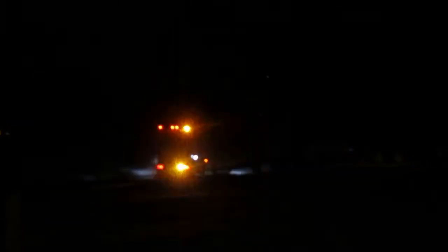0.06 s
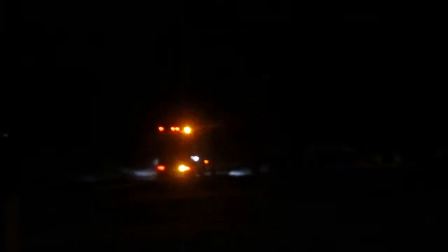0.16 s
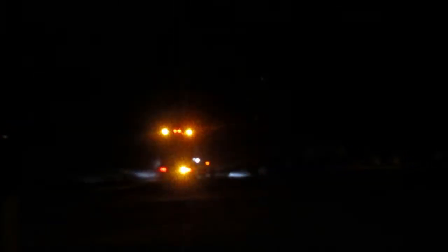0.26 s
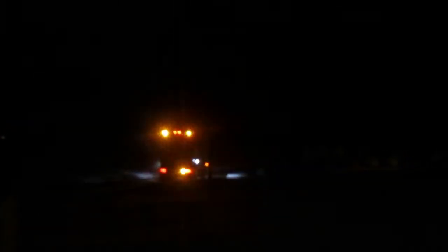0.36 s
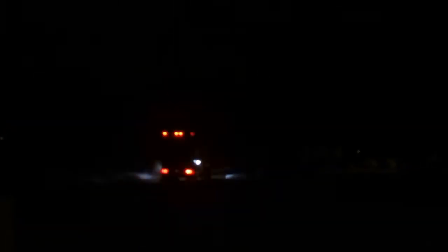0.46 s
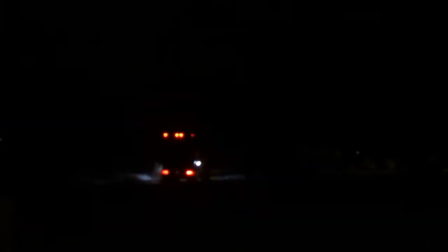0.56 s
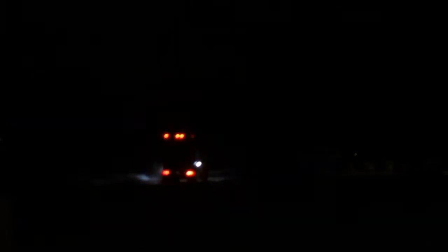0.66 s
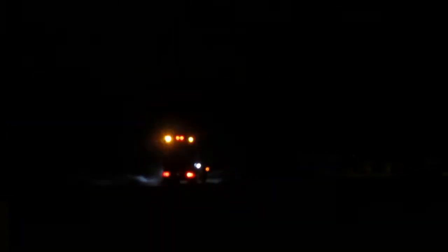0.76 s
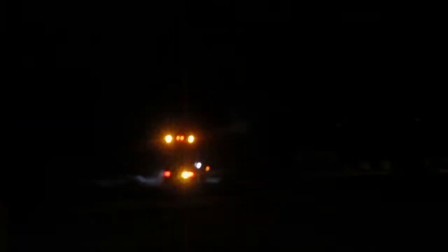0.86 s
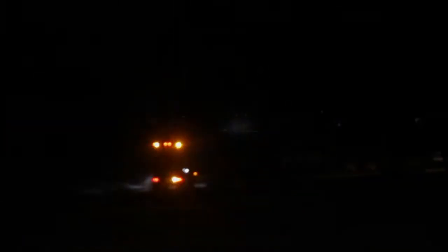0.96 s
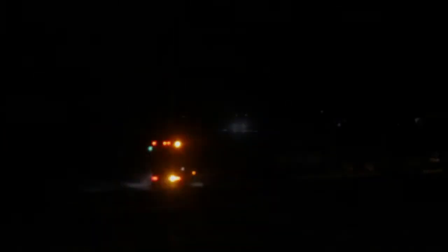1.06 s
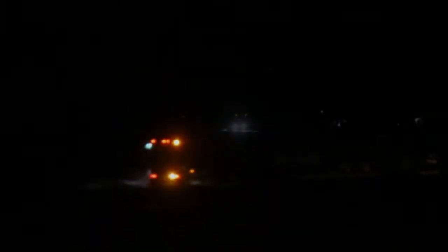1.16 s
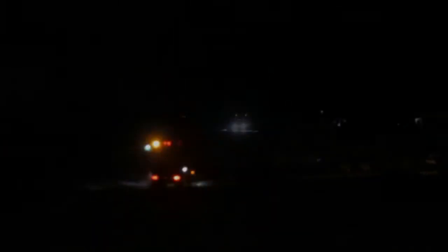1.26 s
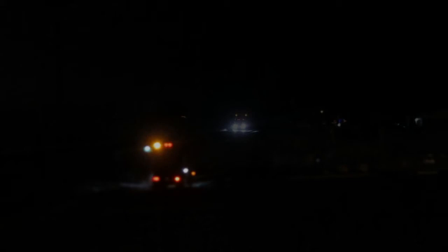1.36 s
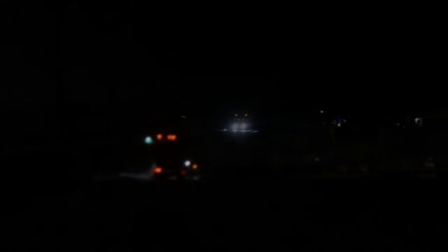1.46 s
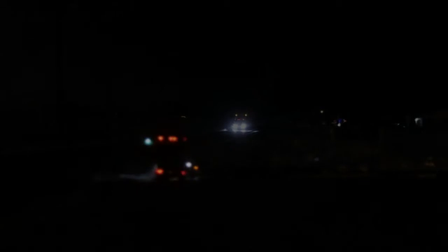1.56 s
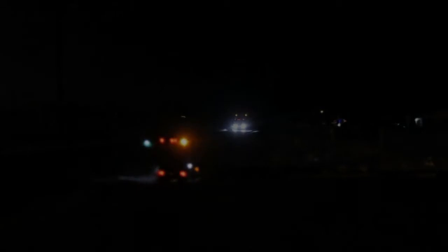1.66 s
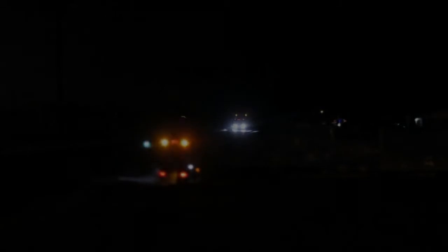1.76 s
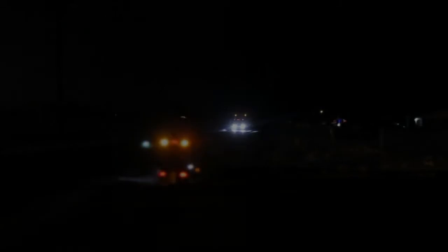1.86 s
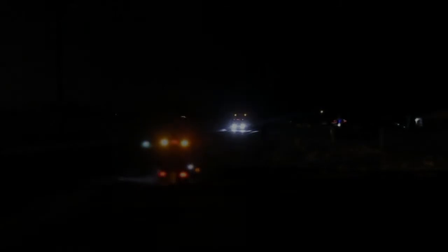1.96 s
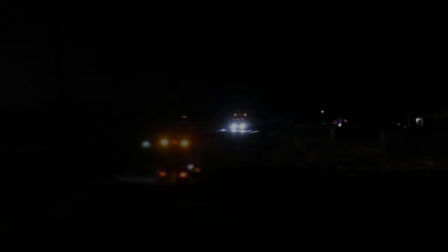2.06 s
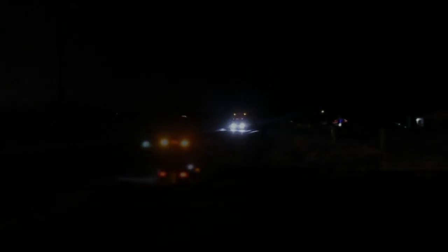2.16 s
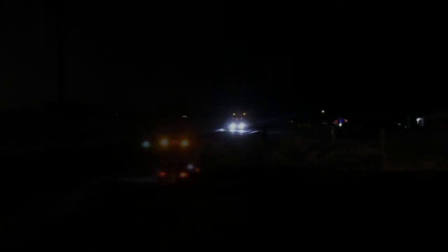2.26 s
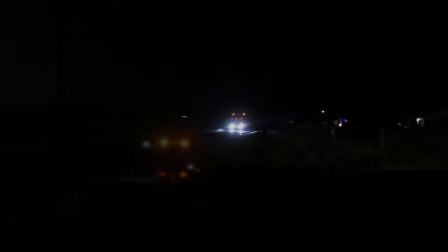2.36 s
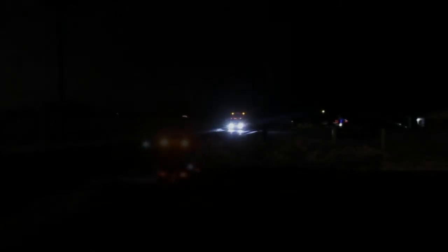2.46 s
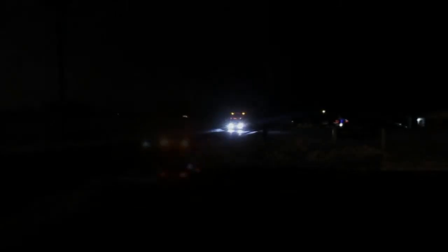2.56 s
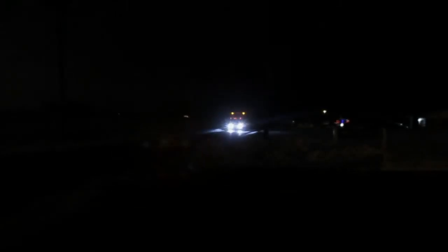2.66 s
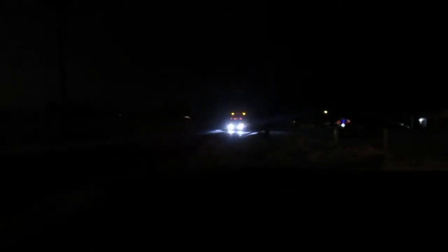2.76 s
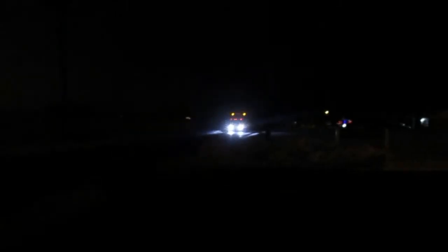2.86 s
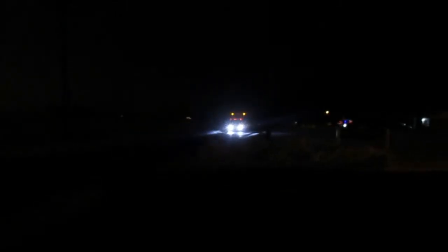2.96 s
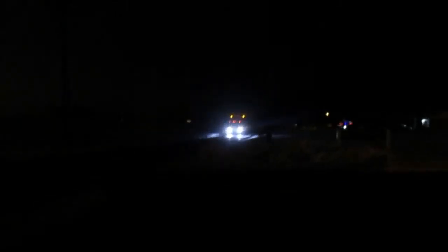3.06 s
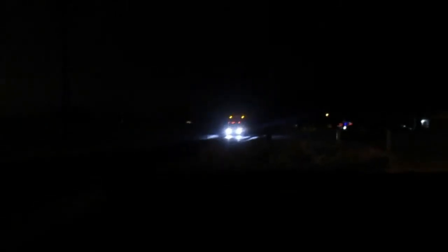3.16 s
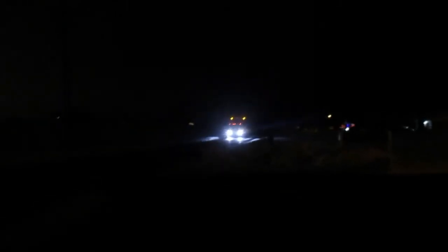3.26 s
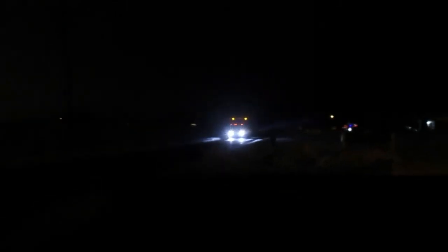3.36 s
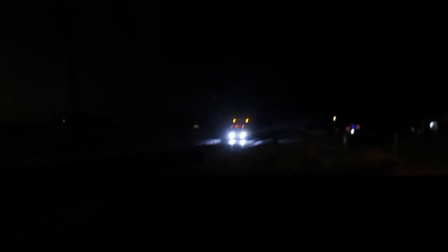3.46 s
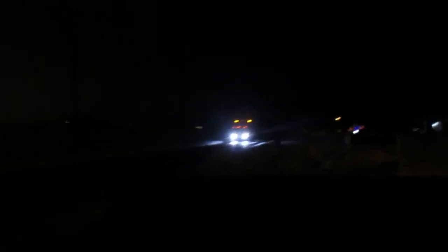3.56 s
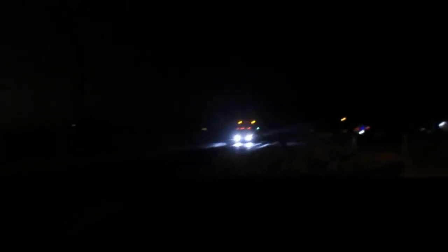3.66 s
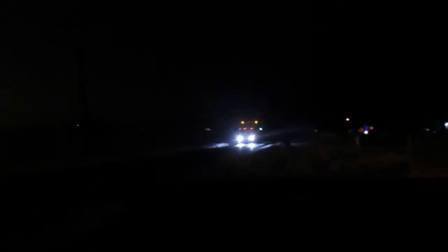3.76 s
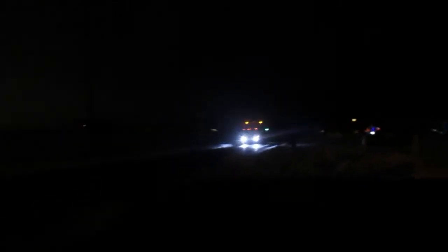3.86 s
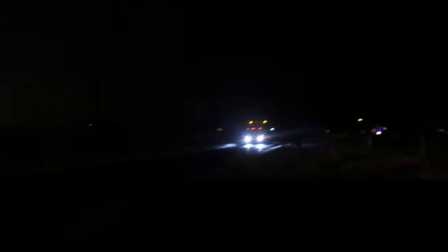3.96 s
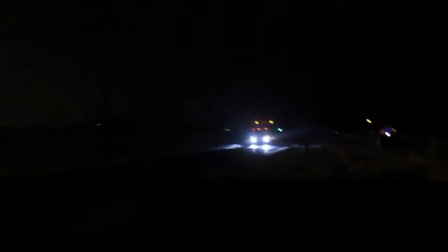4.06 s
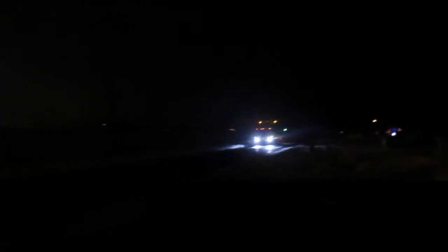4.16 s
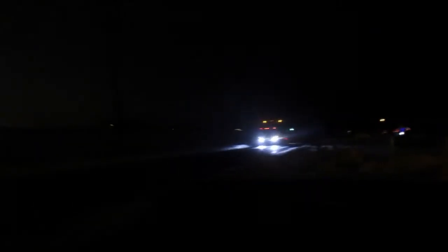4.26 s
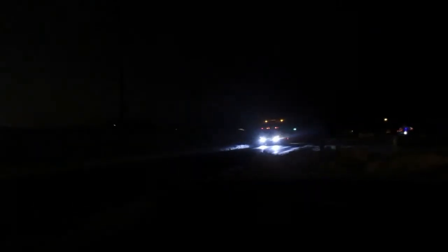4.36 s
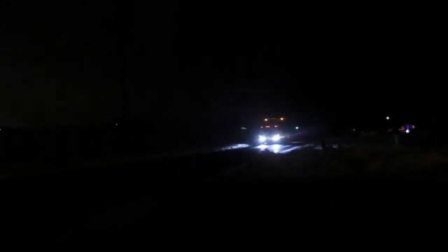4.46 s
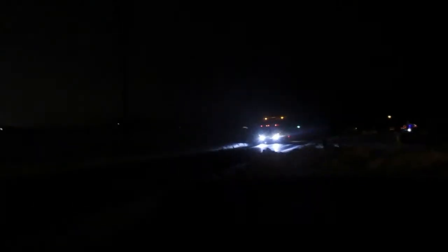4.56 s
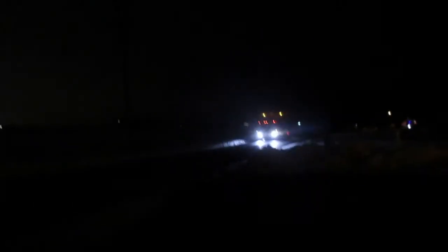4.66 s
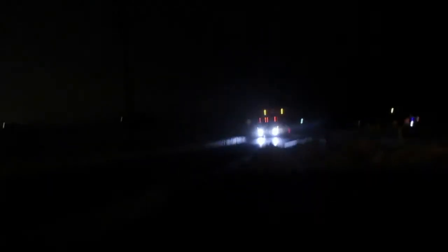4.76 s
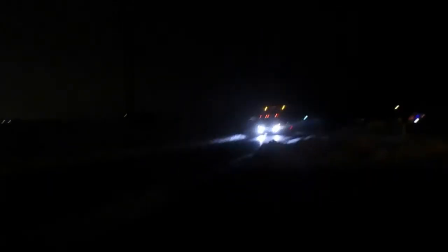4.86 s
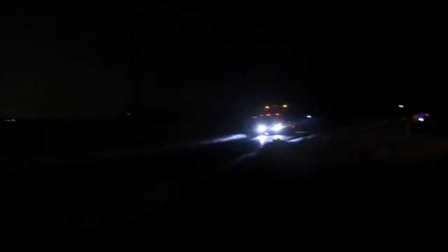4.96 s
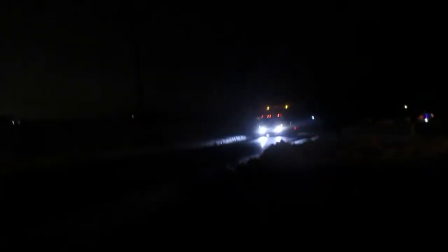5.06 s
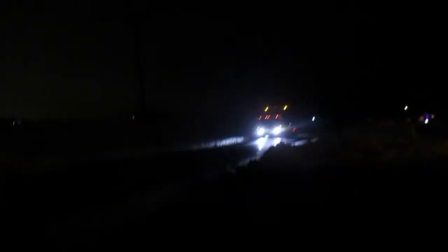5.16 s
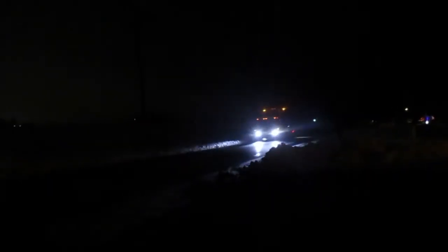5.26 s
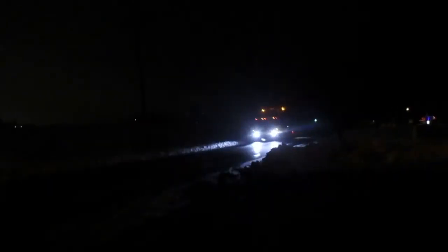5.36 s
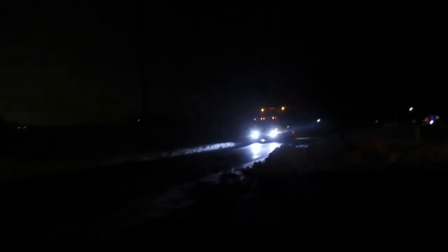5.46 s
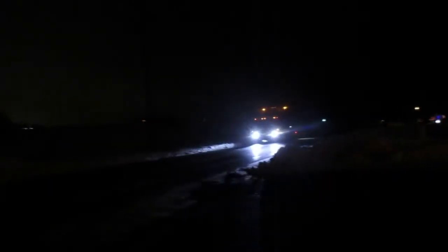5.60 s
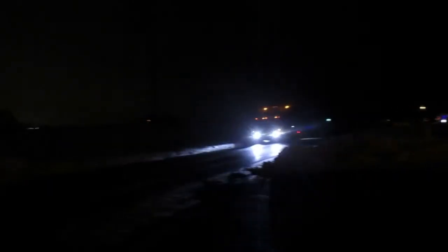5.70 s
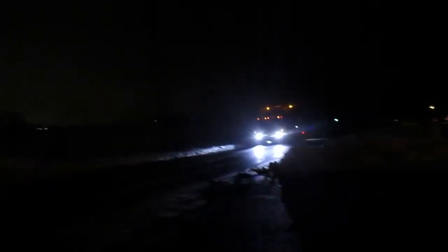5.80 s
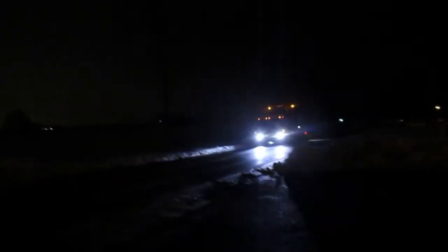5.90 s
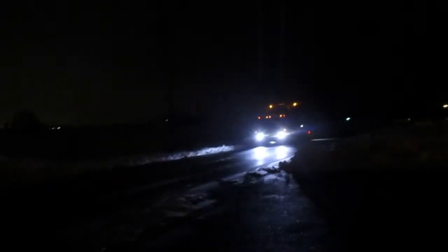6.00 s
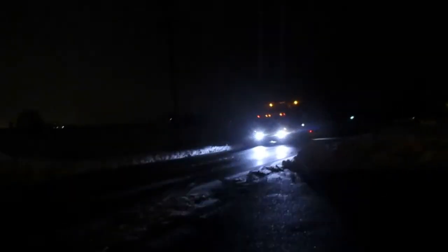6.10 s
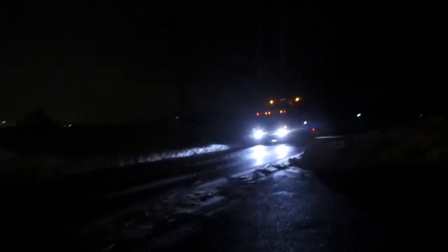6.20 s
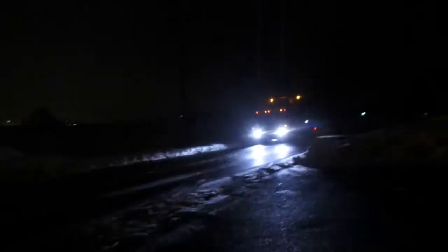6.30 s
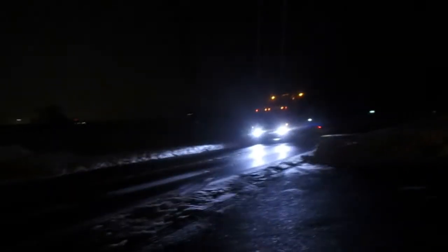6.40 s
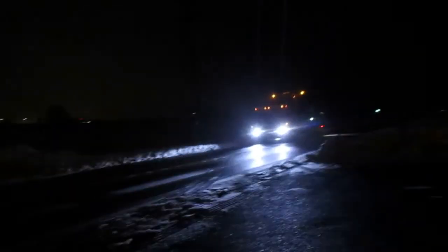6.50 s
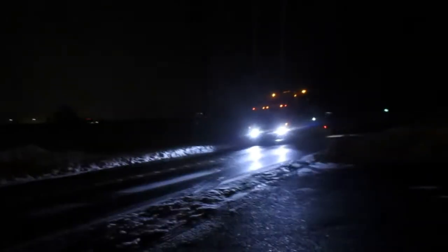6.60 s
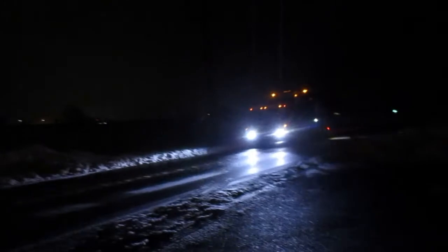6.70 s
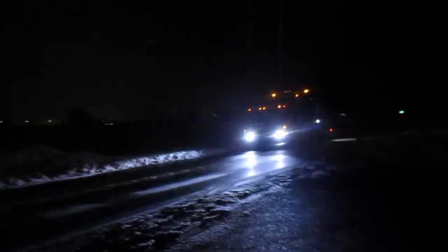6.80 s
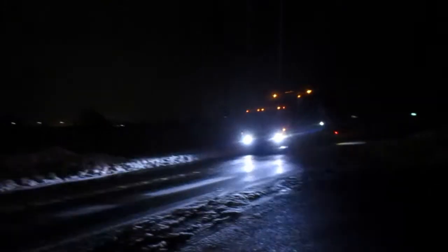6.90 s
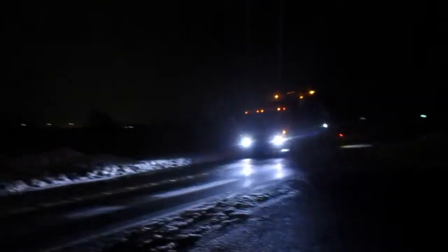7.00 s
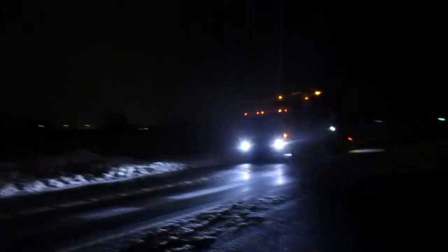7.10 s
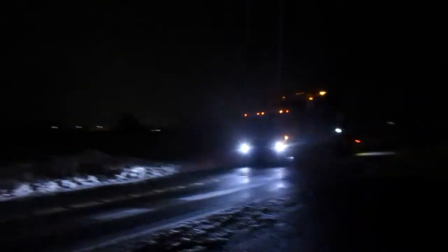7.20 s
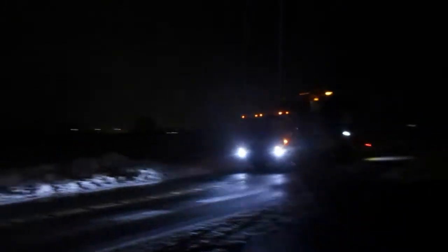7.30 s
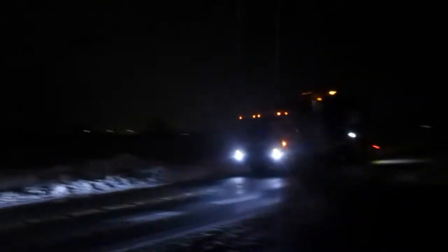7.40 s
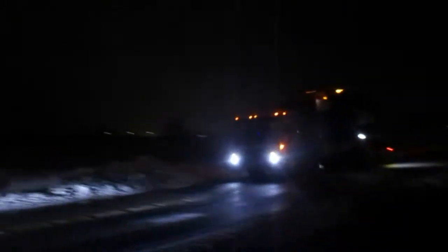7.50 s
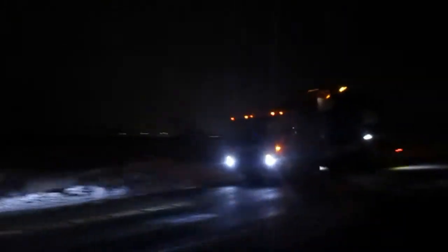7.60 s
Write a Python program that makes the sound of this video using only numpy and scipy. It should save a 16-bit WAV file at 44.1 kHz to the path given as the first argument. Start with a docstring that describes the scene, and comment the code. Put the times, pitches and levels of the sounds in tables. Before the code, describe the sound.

A diesel garbage truck drones away on a wet road at night, fairly quiet, with pulsing clatter and light tyre hiss. It fades from about 0.7 seconds and cuts to silence at 1.7. At 2 seconds a second truck is heard faintly in the distance, fades out, then returns abruptly at about 2.8 seconds with a low boom and clatter. Its engine pitch drops around 3.3 seconds, and a faint swish and tiny tick follow near 3.6. From 4 seconds the engine eases off and the truck coasts with a thin whine and humming tyres, with a slight engine swell near 5. From about 5.7 seconds the engine picks up again, rising in pitch and growing loud as the tyre roar, hiss and spray build. It is closest and loudest around 7 to 7.4 seconds, when it gives one very short horn toot just before the end.

```python
"""A diesel refuse truck drones away on a wet road at night, and the sound cuts to silence. A second is heard
far off and fades; then its level jumps back up and it rolls closer, easing off and picking up again; near the
end it gives one short toot. Periodic firing makes each engine boom, excites the exhaust pipe's resonances and
modulates the clatter. The tyres hum at frequencies proportional to road speed and throw hissing spray."""
import sys
import numpy as np
from scipy import signal
from scipy.fft import rfft, irfft, next_fast_len
from scipy.io import wavfile
from scipy.ndimage import map_coordinates

SR = 44100
rng = np.random.default_rng(int(sys.argv[2]) if len(sys.argv) > 2 else 0)


def bounce(signal):
    """Save signal as a 16-bit WAV file at the path given by the first command-line argument."""
    frames = np.transpose(np.atleast_2d(signal))
    limited = np.clip(frames, -1, 1)
    pcm = np.round(limited * 32767).astype(np.int16)
    wavfile.write(sys.argv[1], SR, pcm)


N = 336924
T = np.arange(N) / SR

# engine of the approaching truck: t/s, firing rate/Hz, load/dB
ENGINE = [(2.85, 71, -1), (3.13, 69.6, 1), (3.28, 64, 1), (3.45, 54, 1), (3.75, 53.6, 4), (3.97, 51, -6),
          (4.1, 51.5, -17), (4.6, 54.6, -18), (4.95, 54, -8.5), (5.5, 52.5, -18), (5.66, 51.5, -8.5),
          (6.06, 53, -4), (6.3, 54.8, -0.5), (6.7, 67, 0.5), (7, 63, -2), (7.31, 64.6, -4.5),
          (7.41, 63.8, -10), (7.63, 66, -5)]
# strength of the six cylinders in firing order: level/dB
CYLINDERS_DB = [2.5, -9.5, -3.5, 2, -13, 1.5]


def approaching_engine(bass_db):
    """Periodic excitation: firings drive a boom, its harmonics, the pipe and the block's clatter."""
    # the pipe's weighting of harmonics that glide through it: f/Hz, gain/dB
    pipe_response = [(102, -3.5), (135, 4), (156, 1.5), (175, -3), (192, 2), (208, -10.5), (250, -11.5),
                     (278, -13), (315, -14), (350, -22)]
    # spectra of the rumble and of the clatter, far and near: f/Hz, level/dB
    rumble_spectrum = [(75, -11), (115, -6.5), (165, -4), (215, -1), (280, 0.5), (330, -4), (410, -21)]
    clatter_far = [(1200, -6.5), (1380, -2.5), (1560, 0), (1820, -10), (2010, -6), (2220, -4.5), (2430, -9),
                   (2900, -8.5)]
    clatter_near = [(1300, 0.5), (1400, -2), (1550, 2), (1740, 2.5), (2000, -7), (2330, 1.5), (2700, -5),
                    (2900, -2.5)]
    # thin whine while coasting: t/s, level/dB
    whine_levels = [(3.8, -73), (4.15, -56), (4.45, -49), (4.65, -58), (4.9, -46), (5.1, -54), (5.6, -58.5),
                    (6, -72.5)]
    firing_hz = in_time(ENGINE)[0]
    firings = cycles(firing_hz * (1 + 0.0021 * drift(8.8)))
    boom = approaching(-24 + bass_db, closing=0.64, load=1) * tone(firings, waver_db=0.5, waver_hz=7)
    harmonics = 0
    for k in range(2, 6):
        gain = from_db(np.interp(k * firing_hz, *np.transpose(pipe_response)))
        harmonics += gain * tone(k * firings + rng.random(), waver_db=2.5, waver_hz=13)
    harmonics *= approaching(-30, closing=0.54, load=0.5)
    growl = approaching(-23, closing=0.64, load=0.34) * exhaust(firings, uneven_db=2.8)
    rumble = approaching(-26, closing=0.6, load=0.21) * noise(rumble_spectrum)
    clatter = approaching(-31.5 + 0.5 * drift(11), closing=0.54, load=0.031)
    clatter *= far_to_near(clatter_far, clatter_near) * knocks(firings, depth=0.27, decay_cycles=0.23)
    whine = from_db(in_time(whine_levels)[0]) * whistle(hz=1696, width_hz=66)
    return boom + harmonics + growl + rumble + clatter + whine


def exhaust(firings, uneven_db):
    """Pipe resonance: a train of unequal puffs, one per firing, excites the modes; rms 1."""
    # f/Hz, bandwidth/Hz, level/dB
    pipe_modes = [(110.4, 32, -5), (159.3, 26, 0.5), (193, 23, -1), (260, 32, -1.5), (297.8, 34, 0)]
    onsets = np.flatnonzero(np.diff(np.floor(firings)))
    scatter_db = uneven_db * rng.standard_normal(N)[:len(onsets)]
    puffs = np.zeros(N)
    puffs[onsets] = from_db(np.resize(CYLINDERS_DB, len(onsets)) + scatter_db)
    ringing = sum((-1) ** k * from_db(db) * resonance(puffs, hz, width_hz)
                  for k, (hz, width_hz, db) in enumerate(pipe_modes))
    return rms_one(signal.sosfilt(signal.butter(4, [90, 340], "band", fs=SR, output="sos"), ringing))


def knocks(firings, depth, decay_cycles):
    """Amplitude modulation: an envelope that jumps at each firing and decays exponentially."""
    strength = from_db(CYLINDERS_DB)[firings.astype(int) % len(CYLINDERS_DB)]
    return rms_one(1 + depth * strength * np.exp(-(firings % 1) / decay_cycles))


def tyre_hum():
    """A deep drone and the tread's periodic whine fall in pitch as the approaching truck slows."""
    # tread blocks meeting the road: t/s, rate/Hz
    block_rates = [(2.85, 187), (3.9, 185), (4.25, 185), (4.6, 185), (5.0, 180), (5.5, 177), (6.0, 179),
                   (6.3, 176.2), (6.7, 173.2), (7.2, 176), (7.63, 164)]
    # deep drone at a fixed ratio to the block rate: t/s, level/dB
    drone_levels = [(2.02, -47), (2.17, -28), (2.28, -43), (2.52, -33.5), (2.72, -37), (2.96, -36.5),
                    (3.12, -39), (3.55, -36), (3.95, -32.5), (4.2, -22), (4.4, -28), (4.52, -29.5),
                    (4.7, -28.5), (4.86, -40), (5.22, -35.5), (5.38, -30.5), (5.92, -31.5), (6.14, -23.5),
                    (6.42, -30), (6.78, -20.5), (7.2, -25), (7.5, -20)]
    # block-rate harmonics that swell in turn: harmonic number, level/dB, peak t/s, half width/s
    tread_tones = [(1, -37.5, 3.15, 0.21), (1, -42, 3.64, 0.26), (1, -32.5, 4.3, .25), (1, -41, 4.9, 0.33),
                   (1, -33.5, 5.93, 0.34), (1, -25, 6.73, 0.39), (1, -24, 7.5, 0.28), (2, -44, 4.94, 0.4),
                   (2, -42.5, 6.1, .3), (3, -50, 3.7, 0.44), (3, -50.5, 4.58, 0.33), (3, -35.5, 6.47, 0.37),
                   (4, -49, 3.6, .5), (4, -44, 5.0, .25), (4, -36, 5.5, .25), (4, -34.5, 5.9, .22),
                   (4, -33.5, 6.26, .13), (4, -30.5, 6.85, .2), (5, -48.5, 3.1, 0.42),
                   (5, -47.5, 4.26, 0.28), (6, -50, 4.32, 0.28), (6, -37, 6.35, 0.25)]
    block_hz = in_time(block_rates)[0]
    drone_hz = 0.773 * block_hz
    rolling = cycles(drone_hz * (1 + 0.0049 * drift(16.6)))
    drone = from_db(in_time(drone_levels)[0]) * tone(rolling, waver_db=2, waver_hz=16)
    octave = approaching(-30.5, closing=0.96, load=0.043) * tone(2 * rolling, waver_db=3, waver_hz=16)
    blocks = cycles(block_hz * (1 + 0.0017 * drift(12)))
    whine = sum(from_db(db) * swell(peak_s, half_width_s) * tone(k * blocks, waver_db=1.25, waver_hz=11)
                for k, db, peak_s, half_width_s in tread_tones)
    return drone + octave + whine


def wet_road(roar_db):
    """Broadband rolling noise: the approaching tyres roar, hiss and throw spray and fine mist."""
    # spectra of the four bands, the roar both far and near: f/Hz, level/dB
    roar_far = [(350, 2), (410, -3), (480, -8.5), (560, 0), (660, -3), (750, 0), (850, -1.5), (940, 2.5),
                (1030, -1), (1120, -1.5), (1220, -15)]
    roar_near = [(340, -11.5), (410, -1.5), (490, -2.5), (550, 1), (620, -3), (705, 1), (820, -2),
                 (1000, -4), (1150, -5.5), (1280, -16.5)]
    hiss_spectrum = [(2950, -0.5), (3400, 0.5), (4200, 1.5), (5200, -1.5), (5900, -6.5), (6500, -8)]
    spray_spectrum = [(6400, -3), (7400, 1), (8400, 0.5), (9800, -5)]
    mist_spectrum = [(10500, -0.5), (11700, -1), (14700, -8.5), (16000, -17)]
    # treble of the wet tyres: t/s, hiss level/dB, spray level/dB, mist level/dB
    water_levels = [(2.02, -50, -65, -72), (2.7, -46.5, -55.5, -66), (2.85, -45.5, -55.5, -66),
                    (3.3, -44.5, -54, -63), (3.8, -43.5, -53.5, -63), (4.05, -42.5, -51, -60),
                    (4.55, -41, -52.5, -61.5), (5.2, -39, -51, -58.5), (5.9, -36, -46.5, -54),
                    (6.3, -35.5, -43.5, -49), (6.7, -34.5, -39, -43), (7.3, -31.5, -34.5, -43),
                    (7.63, -34, -40.5, -45)]
    roar = approaching(-20.5 + roar_db + 0.56 * drift(11), closing=0.97, load=0)
    roar *= far_to_near(roar_far, roar_near)
    hiss_db, spray_db, mist_db = in_time(water_levels)
    hiss = from_db(hiss_db + 0.74 * drift(22)) * noise(hiss_spectrum)
    flicker = from_db(1.44 * drift(22))
    spray = from_db(spray_db) * noise(spray_spectrum)
    mist = from_db(mist_db + 0.61 * drift(15)) * noise(mist_spectrum)
    return roar + near_echo(hiss, strength=0.014) + near_echo(flicker * (spray + mist), strength=0.3)


def horn(start_s, length_s, hz):
    """A vibrating diaphragm: its unsteady harmonics shift in balance, with a rasp at the onset."""
    # harmonics 1 to 12: starting level/dB, final level/dB
    harmonic_levels = [(-7, -9), (2, -3.5), (-7, -12), (-9, -21.5), (-23, -14), (-11, -17), (-21, -38),
                       (-15, -28), (-15, -21), (-29, -26), (-15, -36), (-26, -37)]
    # f/Hz, level/dB
    rasp_spectrum = [(900, -9), (1400, -5), (2500, -5), (4700, -9.5), (6000, -7)]
    attack_s, release_s, rasp_decay_s = 0.0066, 0.0062, 0.03
    age = np.maximum(T - start_s, 0)
    envelope = np.clip(age / attack_s, 0, 1) * np.exp(-np.maximum(age - length_s, 0) / release_s)
    turns = cycles(hz * (1 + 0.0025 * drift(68.6)))
    buzz = 0
    for k, levels in enumerate(harmonic_levels, 1):
        gain = from_db(np.interp(age, [0, length_s], levels) + 2 * drift(41.8))
        buzz += gain * np.sin(2 * np.pi * (k * turns + rng.random() / 2))
    rasp = from_db(-12.5) * np.exp(-age / rasp_decay_s) * noise(rasp_spectrum)
    return from_db(-12) * envelope * (buzz + rasp)


def leaving_truck(firing_hz):
    """Periodic excitation at a steady rate: boom, puffs and pulsing clatter over tyre drone and rumble."""
    # noise spectra: f/Hz, level/dB
    clatter_spectrum = [(500, -7), (620, -5.5), (790, 0), (1000, -3.5), (1170, -5), (1400, -17),
                        (1620, -8.5), (1820, -7.5), (2000, -10.5), (2180, -19), (2420, -9), (2650, -8.5),
                        (2900, -21)]
    hiss_spectrum = [(2900, 0), (3400, -2), (4000, -3), (4500, -5), (5000, -4.5), (6000, -12.5),
                     (6700, -12), (8500, -17.5), (12000, -25), (15800, -33.5)]
    rumble_spectrum = [(10, -14), (26, -2), (40, -3), (75, 1.5), (105, -5), (135, -14), (160, -11),
                       (200, -8), (255, -7), (330, -9.5), (450, -13.5)]
    # whistling hiss: t/s, level/dB
    sizzle_levels = [(0, -51), (0.13, -50), (0.3, -60), (.55, -61), (0.7, -51), (0.92, -61), (1.1, -54),
                     (1.27, -56), (1.5, -70)]
    firings = cycles(firing_hz * (1 + 0.0041 * drift(8)))
    boom = receding(-38, db_per_s=9.3) * np.sqrt(2) * np.sin(2 * np.pi * firings)
    puffs = receding(-61, db_per_s=9.3) * exhaust(firings, uneven_db=8)
    drone = leaving_tyres()
    beat = knocks(firings, depth=0.29, decay_cycles=0.13) * from_db(0.79 * drift(11) + drift(75))
    clatter = receding(-45.64, db_per_s=5.74) * noise(clatter_spectrum)
    hiss = receding(-52.5 + 0.9 * drift(20.4), db_per_s=5.74) * noise(hiss_spectrum)
    sizzle = from_db(in_time(sizzle_levels)[0]) * whistle(hz=3422, width_hz=700)
    surge = from_db(-54.5) * swell(peak_s=0.63, half_width_s=0.089) * whistle(hz=1640, width_hz=270)
    rumble = receding(-46, db_per_s=3.2) * noise(rumble_spectrum)
    return boom + puffs + drone + beat * (clatter + hiss + sizzle + surge) + rumble


def leaving_tyres():
    """Periodic rolling contact: a wavering fundamental and its weaker octave."""
    # t/s, f/Hz, level/dB
    drone_curve = [(0, 125, -54), (.2, 125, -49.5), (.55, 130, -52), (.75, 130.5, -49), (1.0, 128, -49),
                   (1.25, 128, -53), (1.65, 130, -61)]
    hz, db = in_time(drone_curve)
    rolling = cycles(hz * (1 + 0.0113 * drift(6.2)))
    fundamental = tone(rolling, waver_db=5, waver_hz=12)
    octave = from_db(-8.5) * tone(2 * rolling, waver_db=0.5, waver_hz=6.7)
    return from_db(db) * (fundamental + octave)


def tick(start_s):
    """Damped free vibration: five high modes die within milliseconds."""
    # f/Hz, level/dB, 60 dB decay time/s
    modes = [(3720, -3, 0.0033), (4800, -2.5, 0.0069), (12000, -8, 0.0018), (13100, -7, 0.002),
             (14970, -12, 0.002)]
    age = np.maximum(T - start_s, 0)
    ringing = sum(from_db(db - 60 * np.minimum(age / t60, 2)) * np.sin(2 * np.pi * hz * age)
                  for hz, db, t60 in modes)
    return from_db(-15) * ringing * np.minimum(age / 0.0001, 1) * (age < 0.1)


def swish(start_s, end_s):
    """Bright noise under a linear ramp swells softly and stops."""
    ramp = np.clip((T - start_s) / (end_s - start_s), 0, 1) * (T < end_s)
    return from_db(-43.5) * ramp * noise([(7000, -2), (10000, -1), (15500, -16)])


def outdoor_rumble(db):
    """Low-frequency ambient noise beneath the approaching truck."""
    # f/Hz, level/dB
    spectrum = [(20, 6), (45, -1), (85, 0), (130, -9), (220, -4)]
    return from_db(db) * noise(spectrum)


def approaching(db, closing, load):
    """Gain grows with proximity and engine load; closing and load weight the two level curves."""
    # rise as the truck rolls closer: t/s, level/dB
    closing_levels = [(2.85, -21), (3.3, -19), (4.3, -20.5), (5.1, -16), (5.7, -11), (6.3, -7.5),
                      (6.9, -0.5), (7.35, 1.5), (7.63, -4)]
    return from_db(db + closing * in_time(closing_levels)[0] + load * in_time(ENGINE)[1])


def receding(db, db_per_s, from_s=0.71):
    """Attenuation with distance: the gain holds, then falls exponentially."""
    return from_db(db - db_per_s * np.maximum(T - from_s, 0))


def far_to_near(far, near):
    """The colour changes with distance, here an equal-power blend of a far and a near noise."""
    # t/s, near spectrum's share of the power
    nearness = [(3.3, 0), (4.1, 0.6), (5.4, 0.83), (6.6, 0.96)]
    share = in_time(nearness)[0]
    return np.sqrt(1 - share) * noise(far) + np.sqrt(share) * noise(near)


def near_echo(x, strength):
    """Comb filtering: a reflection from a nearby surface interferes at a changing delay."""
    # t/s, delay/ms
    delays = [(3.3, 1.6), (3.75, 1.05), (3.95, 1.223), (4.15, 1.17), (4.35, 1.25), (4.6, 1.4), (4.85, 1.12),
              (5.1, 1.29), (5.4, 1.3), (5.8, 1.3234), (6.2, 1.28), (6.6, 1.5), (7, 1.25), (7.6, 1.27)]
    delay_s = in_time(delays)[0] / 1000
    echo = map_coordinates(x, [(T - delay_s) * SR], order=3)
    return (x - strength * echo) / np.sqrt(1 + strength ** 2)


def tone(turns, waver_db, waver_hz):
    """A sine of rms about 1, amplitude-modulated by the moving air."""
    return np.sqrt(2) * np.sin(2 * np.pi * turns) * from_db(waver_db * drift(waver_hz))


def whistle(hz, width_hz):
    """Narrow-band noise from two passes through one resonance; rms 1."""
    once = resonance(rng.standard_normal(N), hz, width_hz)
    return rms_one(resonance(once, hz, width_hz))


def resonance(x, hz, width_hz):
    """Two-pole resonator with unit peak gain."""
    r = np.exp(-np.pi * width_hz / SR)
    feedback = [1, -2 * r * np.cos(2 * np.pi * hz / SR), r * r]
    return signal.lfilter(np.array([1, 0, -1]) * (1 - r * r) / 2, feedback, x + 1e-18)


def noise(spectrum):
    """Noise of a given relative spectral density, falling 48 dB per octave outside its range; rms 1."""
    size = next_fast_len(N)
    octave = np.log2(np.maximum(np.fft.rfftfreq(size, 1 / SR), 1))
    hz, db = np.transpose(spectrum)
    outside = np.abs(octave - np.clip(octave, np.log2(hz[0]), np.log2(hz[-1])))
    gain = from_db(np.interp(octave, np.log2(hz), db) - 48 * outside)
    return rms_one(irfft(rfft(rng.standard_normal(size)) * gain, size)[:N])


def drift(hz):
    """Random fluctuation, low-passed at hz; rms 1."""
    step, settling = 40, 2000
    r = np.exp(-2 * np.pi * hz * step / SR)
    white = rng.standard_normal(N // step + settling + 2)
    slow = signal.lfilter([1], [1, -2 * r, r * r], white)[settling:]
    return np.interp(np.arange(N) / step, np.arange(len(slow)), rms_one(slow))


def swell(peak_s, half_width_s):
    """Gaussian envelope of height 1."""
    return np.exp(-((T - peak_s) / half_width_s) ** 2)


def gate(start_s, end_s, ramp_s):
    """Trapezoidal envelope, open between two times."""
    return np.clip((T - start_s) / ramp_s, 0, 1) * np.clip((end_s - T) / ramp_s, 0, 1)


def cycles(hz):
    """Phase in cycles, the time integral of frequency."""
    return np.cumsum(hz) / SR


def in_time(rows):
    """Each column after t/s, interpolated at every sample."""
    times, *columns = np.transpose(rows)
    return [np.interp(T, times, column) for column in columns]


def from_db(db):
    """Level to amplitude ratio."""
    return 10 ** (np.asarray(db) / 20)


def rms_one(x):
    """Normalise to rms 1."""
    return x / np.sqrt(np.mean(x ** 2) + 1e-20)


def scene():
    """Superposition: one truck, a silent gap, then the other, faint and fading before it jumps in level."""
    stop_s, resume_s, jump_s = 1.69, 2.019, 2.849
    faint = T < jump_s
    remaining = np.clip((jump_s - T) / (jump_s - resume_s), 0.01, 1)
    fade = np.where(faint, from_db(-8.5) * remaining, 1)
    outdoors = outdoor_rumble(db=-43 - 3.2 * faint)
    truck = approaching_engine(bass_db=-0.5 * faint) + tyre_hum() + wet_road(roar_db=1.1 * faint)
    second = fade * (truck + outdoors) + horn(start_s=7.439, length_s=0.062, hz=510)
    second += swish(start_s=3.42, end_s=3.543) + tick(start_s=3.6178)
    second *= gate(resume_s, np.inf, ramp_s=0.0009)
    first = leaving_truck(firing_hz=61.1) * gate(0, stop_s, ramp_s=0.00048)
    return (first + second)[None]


def record(dry):
    """Band limiting: a steep elliptic low-pass removes the highest treble."""
    cutoff_hz = 15900
    return signal.sosfilt(signal.ellip(10, 0.1, 80, cutoff_hz, fs=SR, output="sos"), dry)


dry = scene()
out = record(dry)
bounce(out)
```